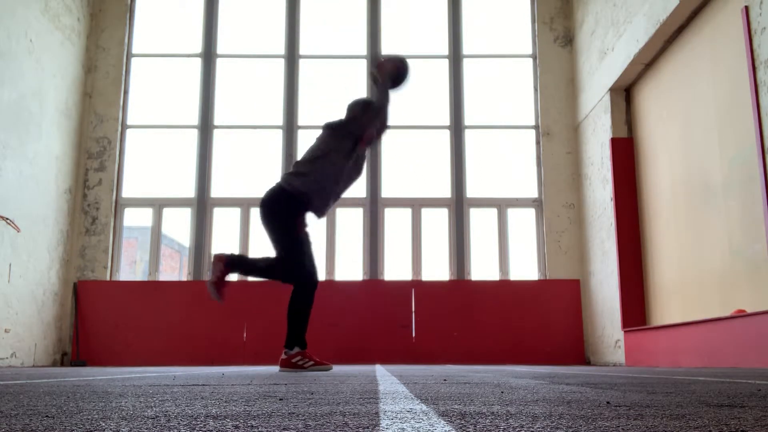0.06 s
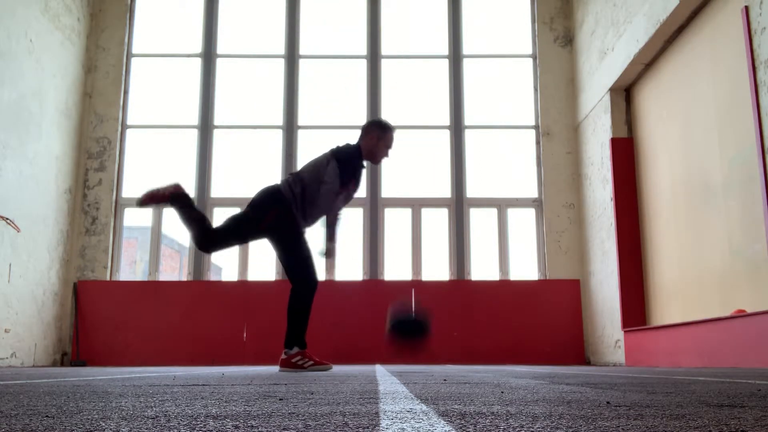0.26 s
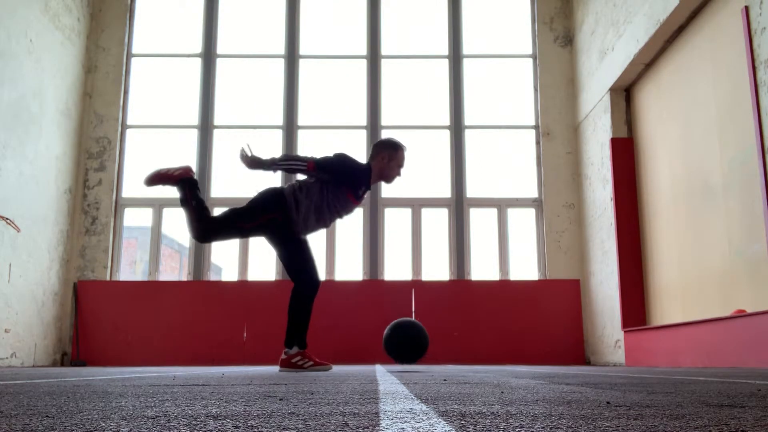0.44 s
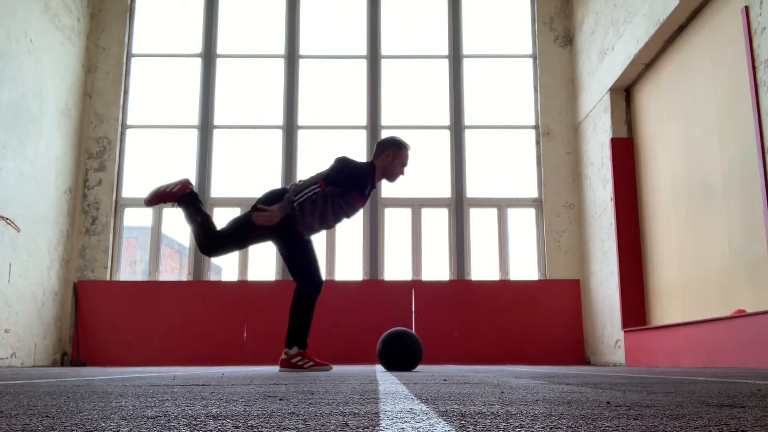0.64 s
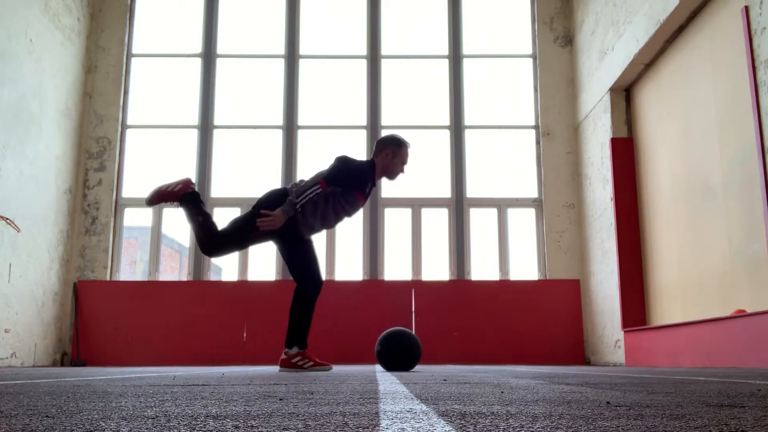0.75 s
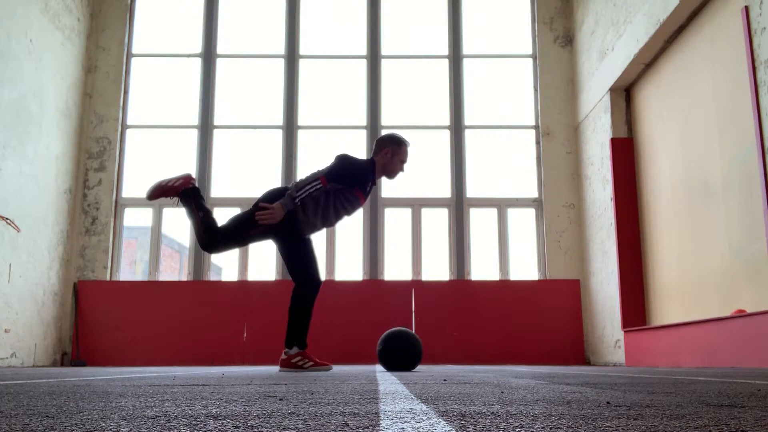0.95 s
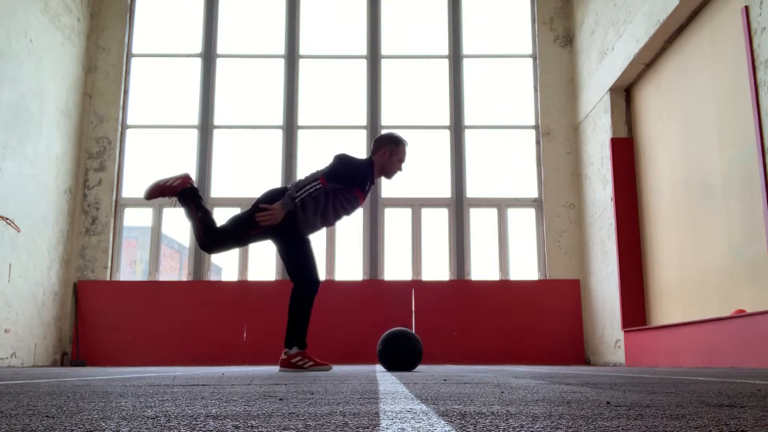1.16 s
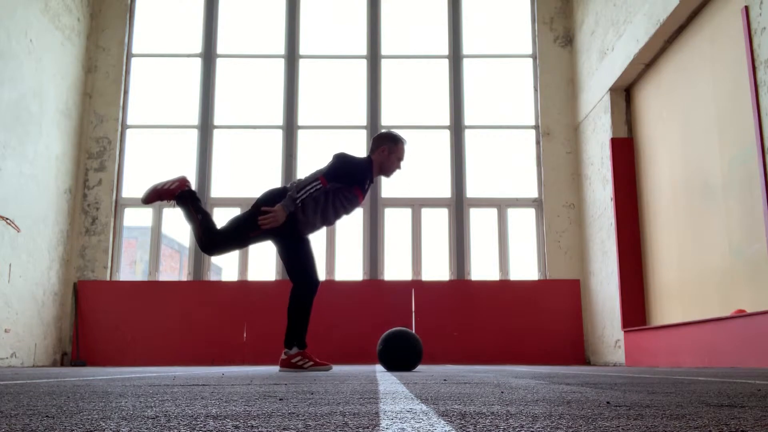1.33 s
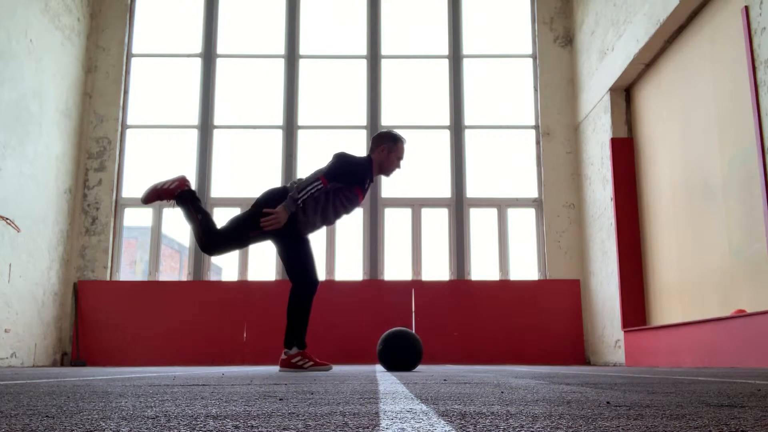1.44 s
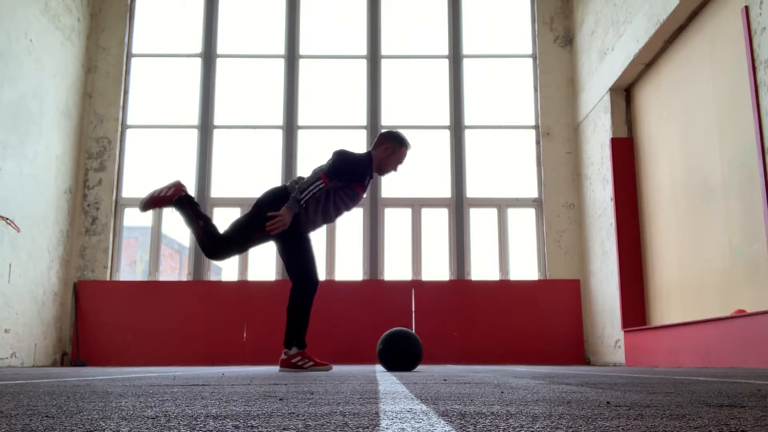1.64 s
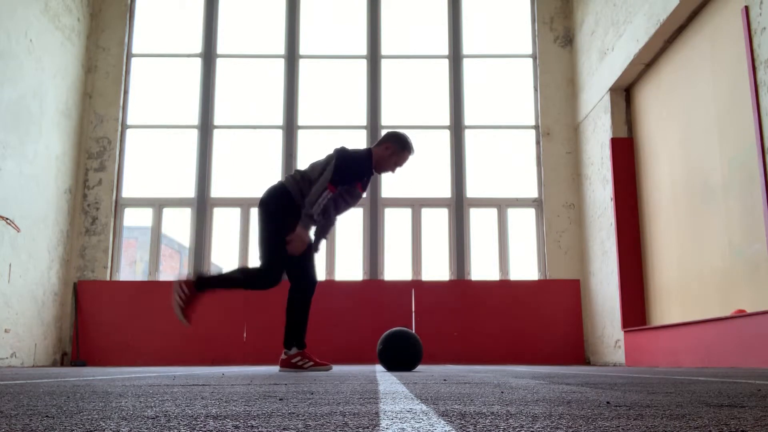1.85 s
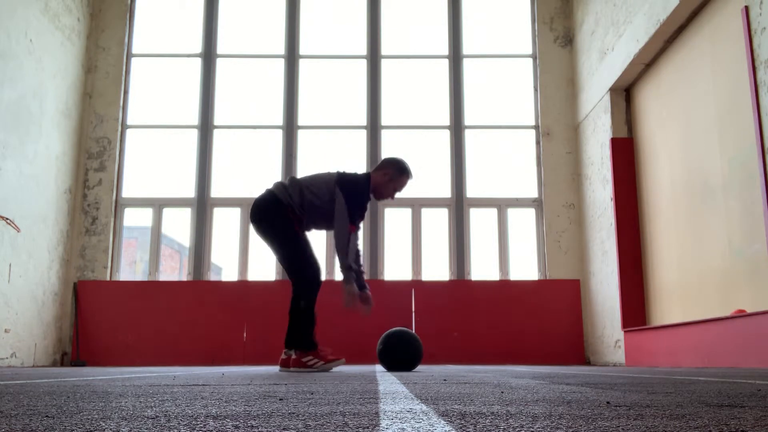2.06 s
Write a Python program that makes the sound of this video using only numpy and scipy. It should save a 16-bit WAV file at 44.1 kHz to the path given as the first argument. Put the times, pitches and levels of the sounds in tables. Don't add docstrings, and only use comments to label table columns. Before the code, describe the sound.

In a large empty sports hall, steady low rumble, a short cloth whoosh, then one loud weighted-ball impact without a real bounce; the boom rings away slowly. Stereo microphones at some distance, near the floor.

```python
import sys
import numpy as np
from scipy import signal
from scipy.fft import rfft, irfft
from scipy.io import wavfile

SR = 44100
rng = np.random.default_rng(int(sys.argv[2]) if len(sys.argv) > 2 else 0)


def field_ratio(decibels):
    return 10 ** (np.asarray(decibels, dtype=float) / 20)


def wrap_up_sound(samples):
    columns = np.atleast_2d(samples).T
    tamed = np.clip(columns, -1, 1)
    steps = np.round(tamed * 32767).astype(np.int16)
    wavfile.write(sys.argv[1], SR, steps)


N = 92610
T = np.arange(N) / SR
HIT_S = .3202

# frequency in Hz, likeness from 0 to 1.
LIKENESS = [(60, 1), (130, 0.96), (290, 0.92), (640, .5), (1400, 0.13), (5000, 0.16), (7500, 0.6),
            (8600, 1)]


def rms_one(x):
    return x / np.sqrt(np.mean(x ** 2) + 1e-20)


def at_hz(points, hz):
    table_hz, values = np.array(points).T
    return np.interp(np.log(hz), np.log(table_hz), values)


def drift(rate_hz):
    r = np.exp(-80 * np.pi * rate_hz / SR)
    white = rng.standard_normal(N // 40 + 2002)
    slow = signal.lfilter([1], [1, -2 * r, r * r], white)[2000:]
    return np.interp(np.arange(N) / 40, np.arange(len(slow)), rms_one(slow))


def dying(start, rise, t60):
    t = np.maximum(T - start, 0)
    return (1 - np.exp(-t / rise)) * field_ratio(-60 * t / t60)


def ringing(modes, start, rise):
    t = np.maximum(T - HIT_S, 0)
    return sum(field_ratio(db) * dying(start, rise, t60) * np.sin(2 * np.pi * hz * t) for hz, db, t60 in modes)


def lowpass(x, order, hz):
    return signal.sosfilt(signal.butter(order, hz, fs=SR, output="sos"), x)


def resonance(hz, width):
    r = np.exp(-np.pi * width / SR)
    poles = [1, -2 * r * np.cos(2 * np.pi * hz / SR), r * r]
    white = rng.standard_normal((2, N + 8000))
    return rms_one(signal.lfilter([1, 0, -1], poles, white)[:, -N:])


def shares(alike):
    return np.sqrt(1 + np.clip(alike, 0, 1) * np.array([[1], [-1]]))


def ports(mid, side):
    # frequency in Hz, lag of the right port in cycles.
    port_lag = [(0, 0), (8700, 2.5), (11700, 3.5), (14650, 4.5), (22050, 7)]
    lag = np.interp(np.arange(N // 2 + 1) * SR / N, *np.transpose(port_lag))
    right = irfft(rfft(mid - side) * np.exp(-2j * np.pi * lag), N)
    return np.array([mid + side, right])


def banded(spectrum, shape, alike=None, patchy_db=0.):
    edges = 22 * 2 ** np.arange(0, 9.7, 1 / 3)
    white = rng.standard_normal((2, 2, N + 8000))
    parts, power = 0, 0
    for k, (low, high) in enumerate(zip(edges, edges[1:])):
        hz = np.sqrt(low * high)
        if hz < spectrum[0][0] or hz > spectrum[-1][0]:
            continue
        sos = signal.butter(3, [low, high], "band", fs=SR, output="sos")
        band = signal.sosfilt(sos, white[k % 2])[:, -N:]
        gain = field_ratio(at_hz(spectrum, hz))
        power += gain ** 2 * (high - low) / SR * 4
        patches = field_ratio(patchy_db * drift(24.0))
        stereo = shares(alike or at_hz(LIKENESS, hz))
        parts = parts + gain * patches * shape(hz) * band * stereo
    return ports(*parts) / np.sqrt(power)


def rumble():
    # frequency in Hz, level in dB per Hz.
    rumble_spectrum = [(25, -33), (50, 1.5), (220, -5.5), (600, -13), (1600, -35), (4200, -44),
                       (5600, -58.5), (16000, -83)]
    # frequency in Hz, width in Hz, level in dB.
    hall_modes = [(58.7, 5, -1), (115.6, 4.7, -6.5), (209.5, 16, 0.5), (231.6, 50, -9), (326.7, 26, -4.5),
                  (375, 14, -10), (480.4, 7.8, -16.5)]
    boom = sum(field_ratio(db) * resonance(hz, width) * shares(at_hz(LIKENESS, hz)) for hz, width, db in hall_modes)
    boom = lowpass(rms_one(ports(*boom)), 2, 800)
    swell = 1 + field_ratio(7) * dying(HIT_S, rise=0.013, t60=2.02)
    return field_ratio(-32) * swell * boom + field_ratio(-33.5) * banded(rumble_spectrum, lambda hz: 1, patchy_db=1.65)


def sleeve():
    # frequency in Hz, level in dB per Hz.
    swish_spectrum = [(2000, 12), (4500, 15.5), (6000, 6), (8000, 8), (11000, 12.5), (16000, -12)]
    # time in seconds, level in dB.
    swish_level = [
        (.05, -76),
        (.1, -73.5),
        (.215, -65.5),
        (.248, -50.5),
        (.268, -59),
        (.31, -56),
        (.33, -75),
        (.36, -100),
    ]
    # centre in seconds, length in seconds, frequency in Hz, level in dB.
    whirs = [
        (.245, .045, 665, -45),
        (1.1, .04, 3700, -73),
        (1.92, .045, 3720, -73),
    ]
    level = field_ratio(np.interp(T, *np.transpose(swish_level)))
    whir = 0
    for s, length, hz, db in whirs:
        whir = whir + field_ratio(db) * np.exp(-.5 * ((T - s) / length) ** 2) * resonance(hz, 6.7)
    return banded(swish_spectrum, lambda hz: level) + ports(*whir * shares(.5))


def crack():
    # frequency in Hz, level in dB, t60 in seconds.
    skin_modes = [(3200, -31, .005), (4500, -23, .005), (5600, -24, .005), (7600, -27, .003),
                  (10600, -26, .006), (13200, -21, .003), (15600, -24, .004)]
    # frequency in Hz, level in dB per Hz.
    crack_spectrum = [(1800, -6), (5000, 0), (9000, -3), (13000, -3), (16000, -5)]
    # frequency in Hz, level in dB per Hz.
    slap_spectrum = [(1800, 2), (3500, -12), (6000, -11.5), (10000, -17)]
    snap = ringing(skin_modes, HIT_S, rise=3e-5)
    burst = field_ratio(-23) * dying(HIT_S, rise=1e-4, t60=.006)
    burst = burst + field_ratio(-37) * dying(HIT_S - .002, rise=0.005, t60=.08)
    slap = field_ratio(-30) * dying(.3555, rise=.001, t60=.02)
    noise = banded(crack_spectrum, lambda hz: burst, alike=.97)
    return ports(snap, 0) + noise + banded(slap_spectrum, lambda hz: slap)


def thud():
    # frequency in Hz, level in dB, t60 in seconds.
    shell_modes = [(170, -9, .02), (790, -11, .03)]
    # frequency in Hz, level in dB, t60 in seconds.
    slab_modes = [(61.4, -30.5, 0.18), (80, -22.5, 0.22), (118.2, -10, 0.22), (231, -25.5, 0.14),
                  (289, -14.5, 0.24), (325, -20.5, 0.37)]
    wave_lead_s, slowness = .0026, 8.37
    t = np.maximum(T - HIT_S, 0)
    sweep = np.sin(-2 * np.pi / (slowness ** 2 * (t + wave_lead_s)))
    wave = field_ratio(.5) * dying(HIT_S, rise=.002, t60=.065) * sweep
    wave = lowpass(np.roll(wave, -17), 6, 1500)
    knock = ringing(shell_modes, HIT_S, rise=.0008)
    return wave + knock + ringing(slab_modes, HIT_S + 0.0015, rise=.004)


def echoes(x):
    # time in seconds, level in dB, dulled above in Hz.
    walls = [
        (.338, -3, 400),
        (.357, -5, 450),
        (.381, -7, 350),
        (.4055, 0, 350),
        (.437, -7, 350),
    ]
    # time in seconds, level in dB, dulled above in Hz.
    late_touches = [
        (0.538, -17, 720),
        (.675, -8, 243),
        (0.754, -11.5, 400),
        (.86, -6, 162),
        (0.951, -13, 384),
    ]
    returns = list(walls) + list(late_touches)
    out = np.zeros((2, N))
    for (s, db, hz), side in zip(returns, rng.uniform(-0.048, 1, len(returns))):
        dull = field_ratio(db) * lowpass(np.roll(x, -30), 3, hz)
        ear_lag = side * 0.00033
        out += [np.interp(T - s + HIT_S + k * ear_lag, T, dull, left=0) for k in (1, -1)]
    return out


def tail():
    # frequency in Hz, level in dB per Hz.
    tail_spectrum = [(25, -1), (55, 1.5), (300, -1), (800, -9), (1600, -31), (3200, -27), (9000, -36.5),
                     (16000, -38.5)]
    # frequency in Hz, t60 in seconds.
    tail_t60 = [(40, 3.6), (100, 2.5), (250, 1.55), (700, 1.31), (1400, 0.84), (3000, 0.92), (7000, 0.74),
                (14000, 0.3)]
    # frequency in Hz, start in seconds after the hit.
    tail_start = [(100, 0.09), (700, 0.0067), (2000, 0.017), (8000, 0.016)]

    def ring(hz):
        return dying(HIT_S + at_hz(tail_start, hz), 0.016, at_hz(tail_t60, hz))

    return field_ratio(-18) * banded(tail_spectrum, ring, patchy_db=1.0)


def scuff():
    # frequency in Hz, level in dB per Hz.
    scuff_spectrum = [(600, -4), (1000, 0), (1450, -1), (1850, -22), (4500, -27), (9000, -31), (16000, -40)]
    return field_ratio(-41) * banded(scuff_spectrum, lambda hz: dying(2.081, rise=.003, t60=.5))


def scene():
    hit = thud()
    mix = rumble() + sleeve() + crack() + hit + echoes(hit) + tail() + scuff()
    return mix * field_ratio([[.45], [-.45]])


def band_limit(x):
    return signal.sosfilt(signal.butter(12, 16510, fs=SR, output="sos"), x)


def record(dry):
    rounded = 1.2 * np.tanh(dry / 1.2)
    top_cut = signal.cheby2(10, 60, 16500 * 1.03, fs=SR, output="sos")
    return band_limit(signal.sosfilt(top_cut, rounded))


dry = scene()
out = record(dry)
wrap_up_sound(out)
```